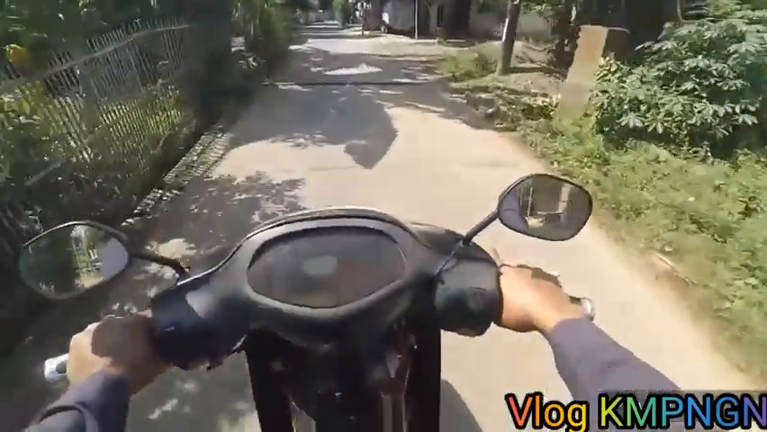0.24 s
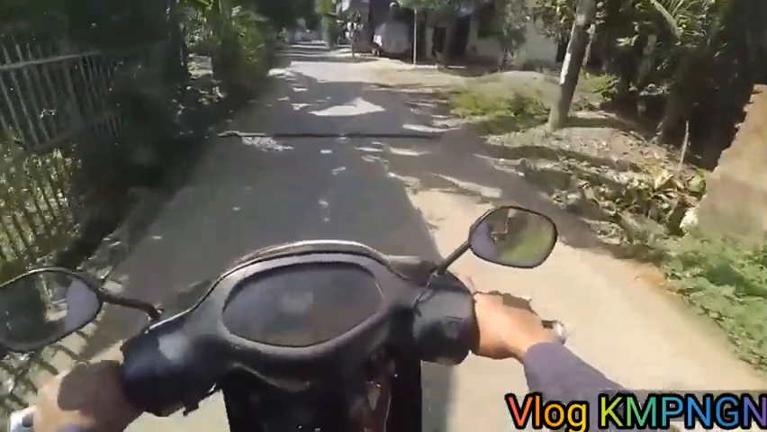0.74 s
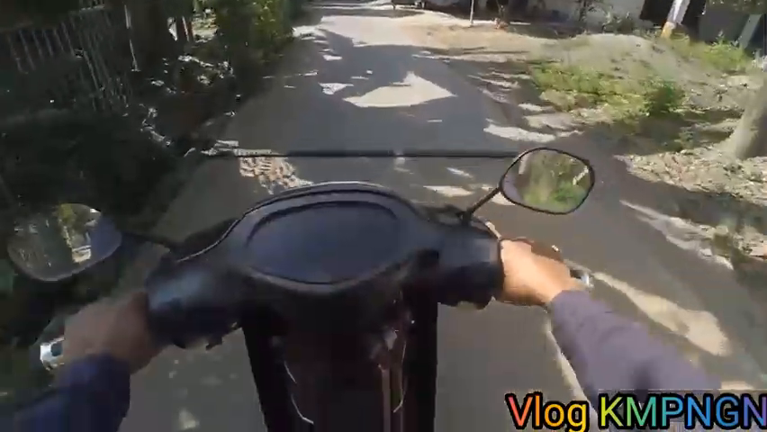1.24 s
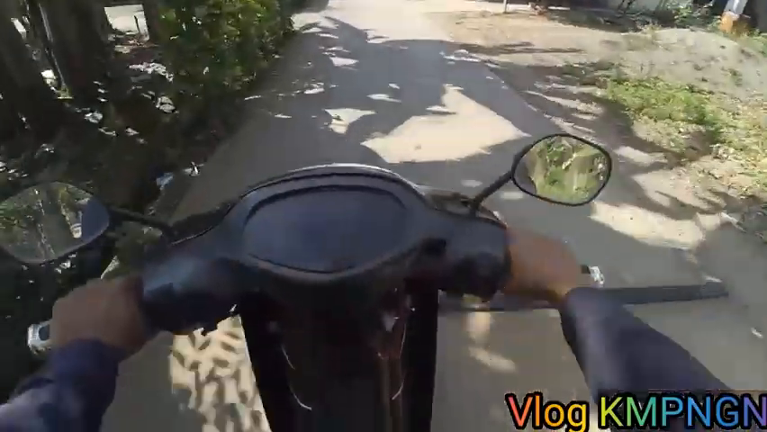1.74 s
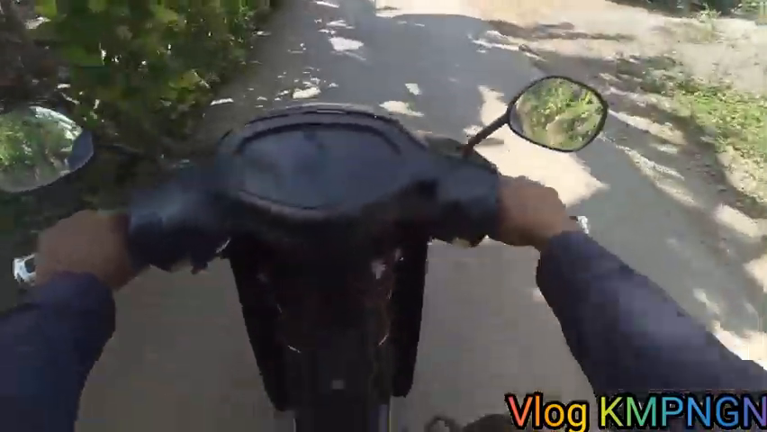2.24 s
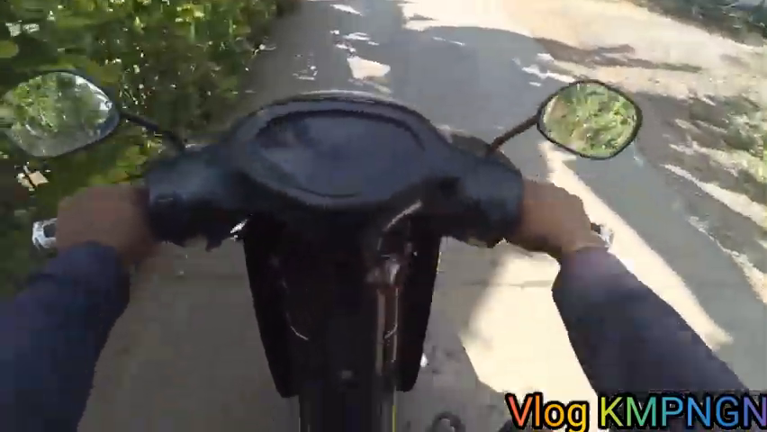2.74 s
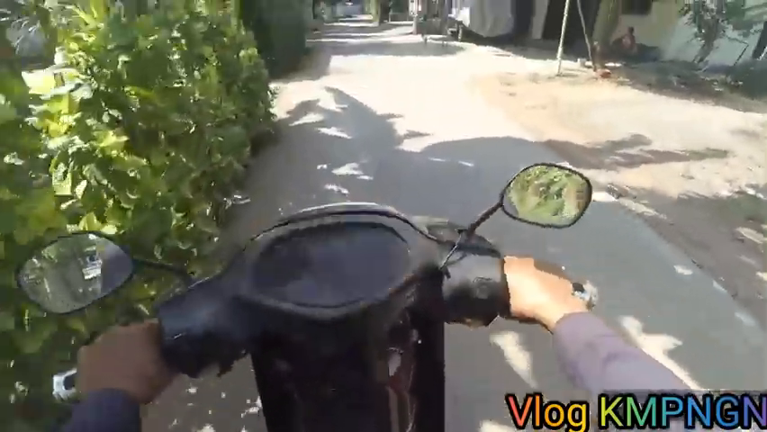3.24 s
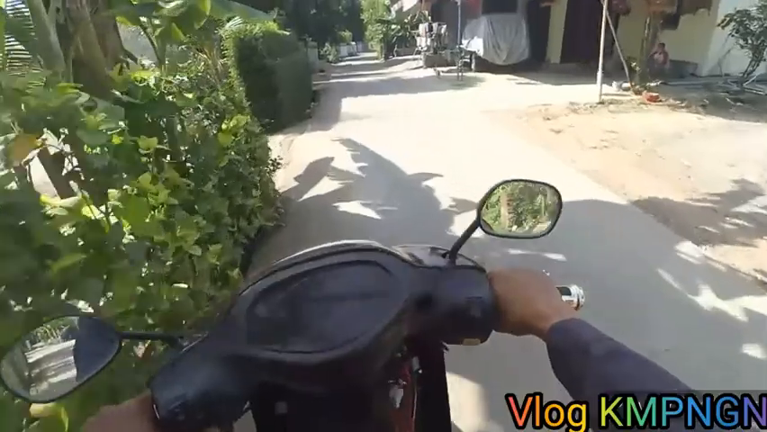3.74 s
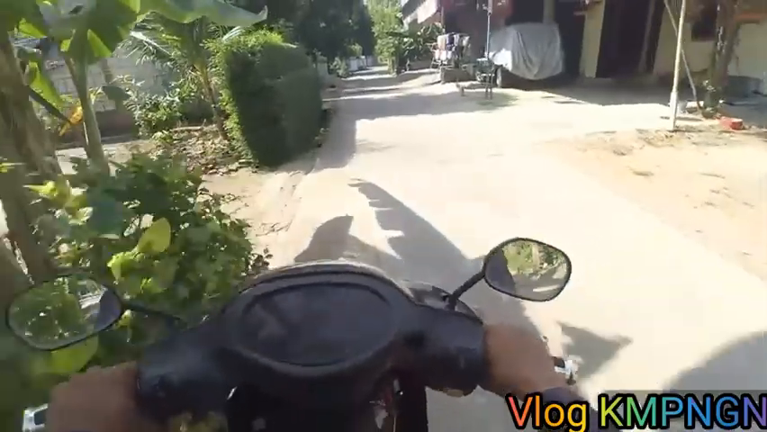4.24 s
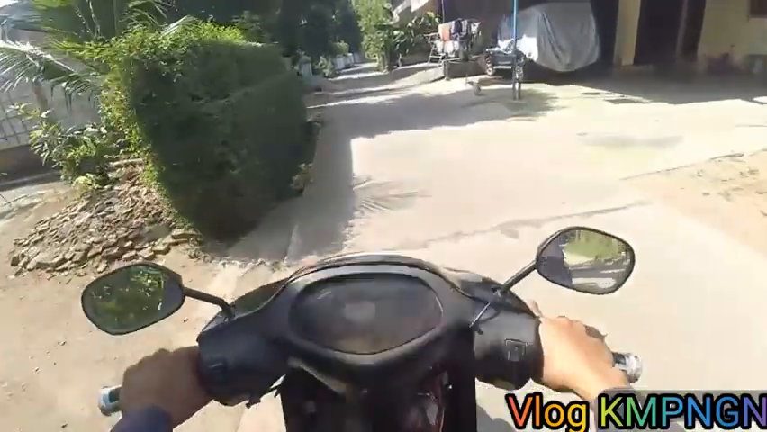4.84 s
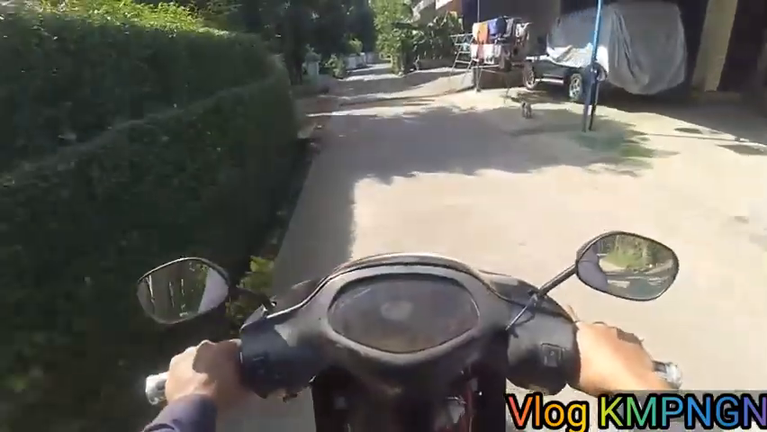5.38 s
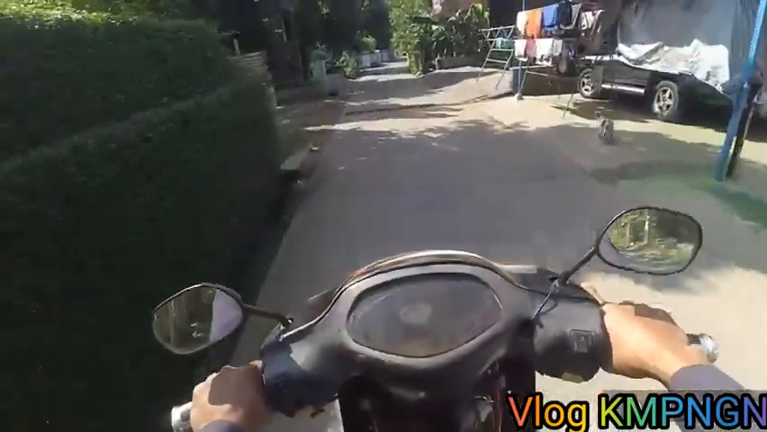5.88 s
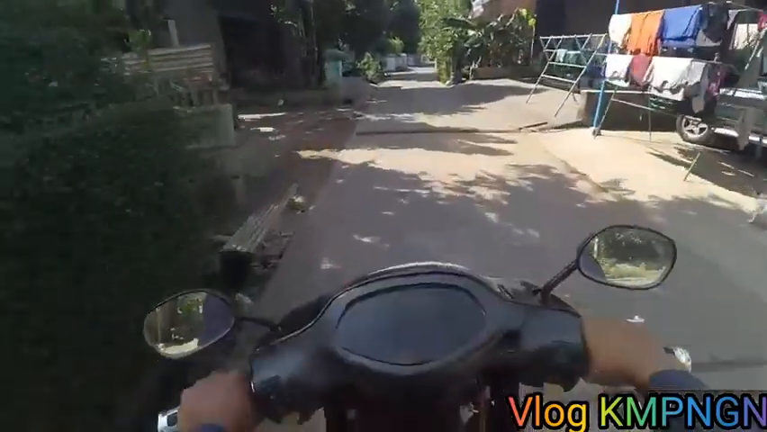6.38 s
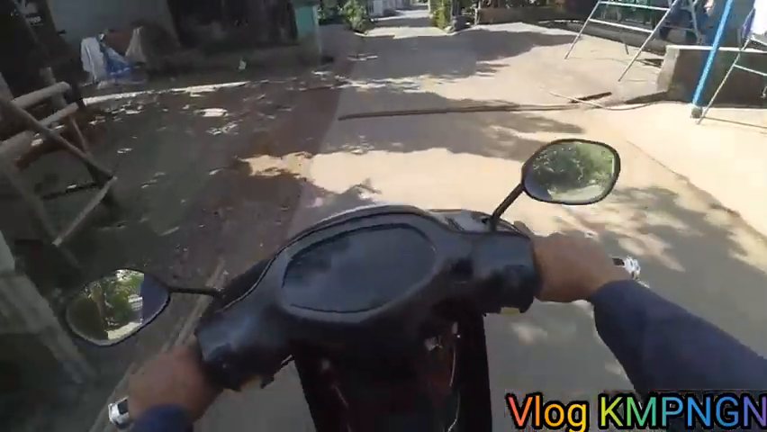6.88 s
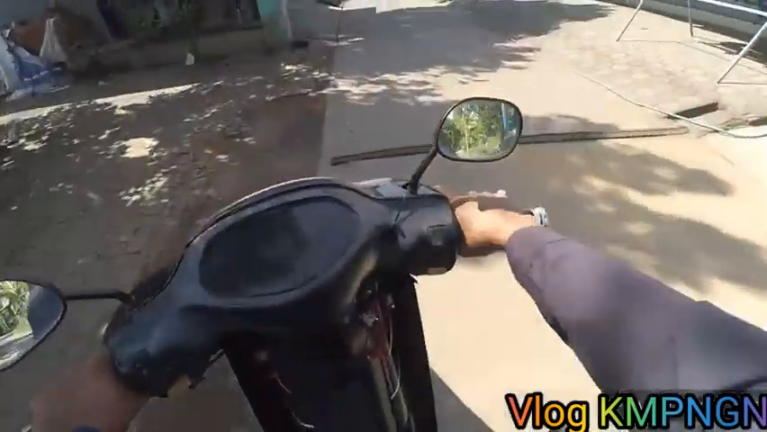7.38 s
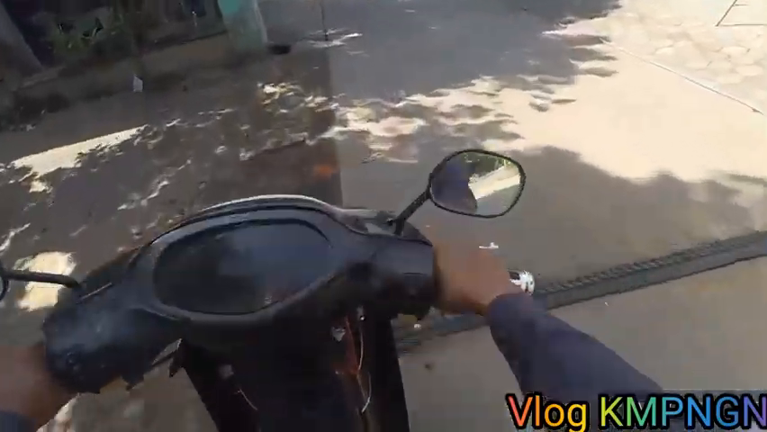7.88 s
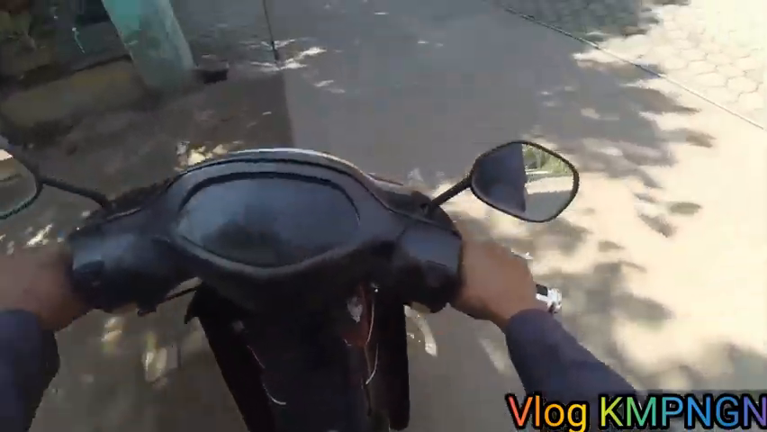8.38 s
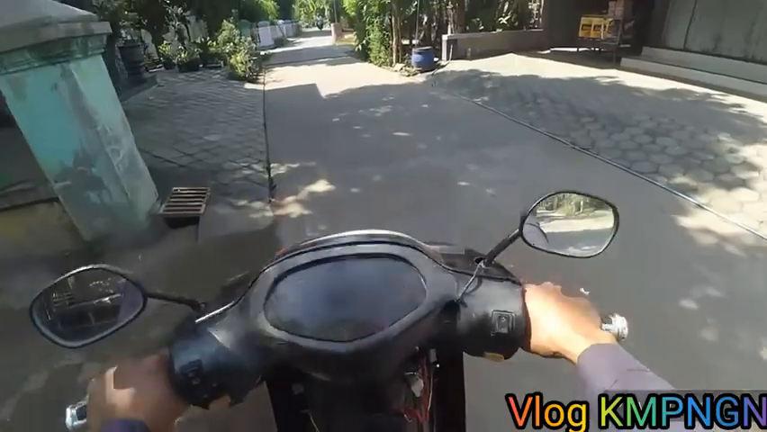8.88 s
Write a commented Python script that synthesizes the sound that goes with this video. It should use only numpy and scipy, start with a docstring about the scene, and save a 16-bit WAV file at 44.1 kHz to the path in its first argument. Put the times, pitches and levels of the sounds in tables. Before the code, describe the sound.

A close, bassy mono pickup on a scooter rider: blunt slow engine pops, shaking camera mount, casing rattle and soft road rush. After a scrape and sharp ticks, the wheel bangs over a bump with a deep, brief wobble. Throttle opens to a faster, buzzier throb, then fades to a lazy putter before rising once more. Roadside birds chirp, distant twitter flutters from hedges, and leaves rustle faintly near the end.

```python
"""Scooter on a lane

A small single-cylinder scooter rolls along a lane, heard by one microphone in a camera on the rider.
Each firing is a filtered pulse over gas noise; in some spans it is a blunt pop with a valve tick.
Sines and noise shake the camera mount; noise through resonances makes the casing rattle and road rush.
Decaying rings and shaped noise make ticks, brushing and a crunching speed bump; gliding sines make birds
chirp by the roadside and twitter in the hedges, and a noise burst rustles the leaves."""
import sys
import numpy as np
from scipy import signal
from scipy.fft import rfft, irfft, next_fast_len
from scipy.io import wavfile
from scipy.ndimage import uniform_filter1d, map_coordinates

SR = 44100
rng = np.random.default_rng(int(sys.argv[2]) if len(sys.argv) > 2 else 0)


def waveform_to_disk(signal):
    """Save audio, clipped to [-1, 1], as 16-bit WAV at the path in sys.argv[1]."""
    frames = np.transpose(np.atleast_2d(signal))
    scaled = np.clip(frames, -1, 1) * 32767
    samples = np.round(scaled).astype(np.int16)
    wavfile.write(sys.argv[1], SR, samples)


N = 402191
TIME = np.arange(N) / SR

# engine speed: time_s, firing_rate_hz
SPEED = [(0.0, 14.4), (0.3, 14.8), (0.76, 14.1), (1.01, 12.4), (1.3, 11.7), (1.44, 14.8), (1.7, 18.1),
         (1.98, 21.9), (2.14, 23.2), (2.39, 24.4), (2.71, 24.7), (3.53, 24.2), (3.95, 23.2), (4.29, 20.9),
         (4.7, 22), (4.92, 21.6), (5.08, 20.0), (5.25, 21.4), (5.41, 20.3), (5.62, 20), (5.76, 18.9),
         (6.1, 17.4), (6.83, 15.5), (6.99, 15.8), (7.31, 14.6), (7.5, 14.5), (7.72, 15.4), (7.99, 17.8),
         (8.3, 20), (8.51, 20.9), (9.12, 21.6)]
# throttle opening, sets the engine levels: time_s, opening_db
THROTTLE = [(0, -8.5), (.35, -9), (1.4, -8.5), (1.85, -2.5), (2.2, 2), (3.2, 3), (4.1, 0.7), (4.47, -2.5),
            (4.75, 0), (5, -3.5), (5.31, -1), (5.8, -2), (6.8, -4.5), (7.21, -6), (7.6, -6.5), (8.2, -3),
            (8.7, -1), (9, -2.4), (9.12, -1.5)]
# camera casing resonances: centre_hz, width_hz, level_db
CASING = [(988, 127, 2), (1091, 107, 2), (1237, 155, 1.5), (1535, 69, -3.5), (1797, 69, -3),
          (2052, 230, -5.5), (2387, 157, -4), (2639, 83, 0), (3290, 200, -11.5), (3510, 170, -10),
          (4145, 260, -2.5), (4530, 190, -26), (5830, 1730, -16)]


def amp(db):
    """Amplitude ratio of a level in dB."""
    return 10 ** (np.asarray(db) / 20)


def unit(x):
    """x scaled to rms 1."""
    return x / np.sqrt(np.mean(x ** 2) + 1e-20)


def curves(rows):
    """One value per sample for each column after the time."""
    time_s, *columns = np.transpose(rows)
    return [np.interp(TIME, time_s, column) for column in columns]


def wobble(rate_hz):
    """Smooth random curve, rate_hz knots a second."""
    knots = rng.standard_normal(int(N * rate_hz / SR) + 4)
    fine = map_coordinates(knots, [np.arange(8 * len(knots)) / 8])
    return np.interp(8 * rate_hz * TIME, np.arange(len(fine)), fine)


def filtered(x, response):
    """x through a complex response of frequency."""
    size = next_fast_len(N + SR)
    spectrum = rfft(x, size) * response(np.fft.rfftfreq(size, 1 / SR))
    return irfft(spectrum, size)[:N]


def modes(rows):
    """Causal response of parallel resonances (centre_hz, width_hz, level_db), signs alternating."""
    def response(f):
        total = 0
        for k, (hz, width_hz, db) in enumerate(rows):
            damping = 1j * f * width_hz
            total = total + (-1) ** k * amp(db) * damping / (hz * hz - f * f + damping)
        return total
    return response


def colour(points):
    """Gain through (frequency_hz, level_db) points on a log frequency axis."""
    point_hz, db = np.transpose(points)
    return lambda hz: amp(np.interp(np.log(hz + 1), np.log(point_hz + 1), db))


def levelled(x, window_s):
    """x held near rms 1 over a sliding, twice-smoothed window."""
    size = int(window_s * SR)
    power = uniform_filter1d(uniform_filter1d(x * x, size), size)
    return x / np.sqrt(np.abs(power) + 1e-20)


def patchy(patchy_db):
    """White noise with patches of random gain in time and frequency."""
    z = signal.stft(rng.standard_normal(N), nperseg=512)[2]
    field = uniform_filter1d(uniform_filter1d(rng.standard_normal(z.shape), 5, 0), 8, 1)
    return signal.istft(z * amp(patchy_db * unit(field)), nperseg=512)[1][:N]


def swells(events, width_s):
    """Sum of bell-shaped gains around (time_s, peak_db) events."""
    return sum(amp(db) * np.exp(-.5 * ((TIME - s) / width_s) ** 2) for s, db in events)


def cycle():
    """Firing count over time: the integral of a slightly unsteady firing rate."""
    late_cycles = .37  # the first firing comes this far in
    rate_hz = curves(SPEED)[0] * (1 + .002 * wobble(10))
    return np.cumsum(rate_hz) / SR + 1 - late_cycles


def hedge():
    """Short blurred notes flutter in the hedges and smear into echoes; once the leaves rustle close by."""
    # leaves rustling past: time_s, spread_s, centre_hz, width_hz, level_db
    leaf_burst = (8.73, .06, 4500, 2200, -47)
    # faint far notes: start_s, length_s, pitch_hz, level_db
    twitter_notes = [(0, 0.28, 7200, -64), (3.3, 0.16, 5400, -60), (4.04, .13, 7660, -62),
                     (4.2, .3, 6660, -56.5), (4.2, .1, 8800, -61), (4.43, .08, 8750, -62),
                     (4.45, .3, 7050, -62), (4.5, 0.28, 5600, -54), (4.62, 0.15, 8800, -67),
                     (4.86, .16, 7800, -65), (5.06, .1, 8800, -64), (5.95, .12, 7200, -62),
                     (5.98, .07, 8800, -66), (6.15, .3, 7900, -65), (6.33, .18, 8700, -69),
                     (6.35, 0.18, 7170, -60), (6.82, 0.19, 7140, -58), (6.84, .12, 8800, -64),
                     (6.86, .08, 6300, -59), (6.97, .15, 7500, -59), (7, .12, 7150, -61),
                     (7.05, 0.17, 6750, -62), (7.17, 0.34, 7320, -61), (7.26, .2, 6520, -60),
                     (7.5, 0.17, 7300, -64), (6.6, 0.22, 7600, -66), (7.3, 0.28, 7650, -70),
                     (7.35, 0.18, 8800, -69)]
    blur, drift, flutter_db = .011, .007, 2.8  # blur and drift are shares of pitch
    echo_t60_s, echo_db = 1, 0.5

    s, spread_s, leaf_hz, width_hz, leaf_db = leaf_burst
    leaves = unit(filtered(rng.standard_normal(N), lambda f: modes([(leaf_hz, width_hz, 0)])(f) ** 2))
    rustle = amp(leaf_db + 1.4 * wobble(96)) * np.exp(-.5 * ((TIME - s) / spread_s) ** 2) * leaves

    notes = np.zeros(N)
    for start_s, length_s, hz, db in twitter_notes:
        here = slice(round(start_s * SR), round((start_s + length_s) * SR))
        u = (TIME[here] - start_s) / length_s
        pitch_hz = hz * (1 + blur * wobble(600)[here] + drift * wobble(11)[here])
        shape = np.sqrt(np.sin(np.pi * np.clip(u, 0, 1)))
        size = amp(db - 1 + flutter_db * wobble(35)[here]) * shape
        notes[here] += size * np.sin(2 * np.pi * np.cumsum(pitch_hz) / SR)

    t = TIME[:SR // 2]
    far = rng.standard_normal(len(t)) * amp(-60 * t / echo_t60_s)
    echoes = signal.fftconvolve(notes, far / np.linalg.norm(far))[:N]
    return rustle + notes + amp(echo_db) * echoes


def birds():
    """Gliding, slightly husky whistles, trailed by scattered echoes from the lane."""
    # bird notes: start_s, length_s, start_hz, end_hz, level_db
    chirp_notes = [(0.12, 0.042, 7370, 7300, -58), (.22, .08, 7270, 7220, -66),
                   (.54, 0.14, 7870, 7700, -67), (1.73, 0.09, 5760, 5610, -49.5),
                   (1.873, 0.085, 3090, 3290, -41), (1.943, 0.057, 3230, 3210, -47),
                   (1.972, .045, 3430, 3430, -49), (1.96, 0.12, 5140, 5220, -56),
                   (1.999, 0.043, 3200, 2660, -43), (3.226, 0.018, 3920, 3560, -40),
                   (3.242, 0.04, 3470, 3600, -41), (3.877, .022, 4850, 4900, -42),
                   (3.9, 0.047, 4740, 4600, -33.5), (3.947, .013, 4800, 5500, -42),
                   (3.957, 0.032, 5380, 5100, -43), (3.994, .04, 5150, 5080, -51),
                   (3.988, .04, 4600, 4600, -49), (3.968, 0.04, 3330, 3350, -47),
                   (4.002, 0.013, 4380, 4100, -40), (5.145, .05, 3680, 3620, -49),
                   (5.151, 0.049, 7280, 5830, -43.5), (5.191, 0.017, 5900, 4430, -36.5),
                   (5.199, 0.039, 3860, 3310, -35), (5.233, 0.036, 3160, 3010, -43),
                   (5.27, .035, 2970, 2575, -45), (5.355, 0.036, 3840, 3470, -30.5),
                   (5.385, 0.035, 3510, 3300, -39.5), (5.575, 0.042, 2760, 2607, -40.5),
                   (5.675, 0.048, 3280, 2660, -43), (5.718, 0.033, 2900, 3100, -39.5),
                   (5.768, 0.066, 3290, 3390, -36.5), (5.835, 0.065, 3090, 2514, -35.5),
                   (5.92, .085, 2630, 2655, -49), (5.99, 0.086, 2326, 2260, -48.5),
                   (6.13, 0.073, 1800, 1830, -52), (6.22, 0.065, 2390, 2456, -48),
                   (6.299, 0.056, 2990, 2890, -47), (6.365, 0.089, 2970, 3290, -45),
                   (6.424, 0.086, 3280, 3500, -41.5), (6.441, 0.036, 3410, 3760, -42.5),
                   (6.47, .05, 4980, 4860, -56), (6.5, 0.04, 3000, 2620, -39),
                   (6.645, 0.08, 2660, 2575, -45), (6.686, 0.064, 4860, 5070, -56),
                   (6.763, .03, 5060, 4850, -56), (6.791, 0.025, 4800, 4330, -48)]
    settle, swell_share, edge_db = 1.6, .4, -9
    overtone_db, breath_db = -31.5, -19

    dry, quiver = np.zeros(N), wobble(250)
    breath_colour = colour([(2000, -30), (4000, 11.0), (15000, -16)])
    breath = amp(breath_db) * unit(filtered(rng.standard_normal(N), breath_colour))
    for start_s, length_s, start_hz, end_hz, db in chirp_notes:
        u = np.linspace(0, 1, round(length_s * SR))
        here = slice(round(start_s * SR), round(start_s * SR) + len(u))
        edge = np.clip(np.minimum(u, 1 - u) * length_s / .002, 0, 1)
        # the glide is quick at first and settles; the level swells, then fades
        hz = start_hz + (end_hz - start_hz) * np.expm1(-settle * u) / np.expm1(-settle)
        level_db = db + np.interp(u, [0, swell_share, 1], [edge_db, 0, edge_db])
        phase = 2 * np.pi * np.cumsum(hz * (1 + .006 * quiver[here])) / SR
        whistle = np.sin(phase) + amp(overtone_db) * np.sin(2 * phase) + breath[here]
        dry[here] += np.sqrt(2) * amp(level_db) * edge * whistle

    t = TIME[:SR // 3]
    lane = rng.standard_normal(len(t)) * amp(-60 * t / .5) * (t > .004)
    wet = amp(-4.5) * signal.fftconvolve(dry, lane / np.linalg.norm(lane))[:N]
    return amp(2.2) * (amp(2 * wobble(110) - 1.2) * dry + wet)


def ticks():
    """Each loose tick is one short ring of the casing over a noise click."""
    # ticks in the casing: time_s, level_db, ring_hz
    tick_rows = [(.811, -25, 4240), (.8405, -26, 4220), (1.043, -37, 4150), (1.1378, -39, 2100),
                 (1.2, -36, 1250), (1.3542, -29, 2580), (1.4715, -20.5, 1020), (2.176, -33, 2540),
                 (2.58, -30, 2650), (2.9981, -34, 2740), (5.025, -35, 2650), (5.074, -30.5, 2630),
                 (5.366, -27, 2590), (6.103, -33, 2710), (6.159, -31, 2590), (6.457, -33, 2550),
                 (6.581, -37, 4230), (7.0908, -36, 2060), (7.2245, -37, 2150), (8.0568, -35, 2690),
                 (8.3776, -35.5, 2660)]
    out, t = np.zeros(N + SR), TIME[:SR // 10]
    for s, db, hz in tick_rows:
        ring = np.sin(2 * np.pi * hz * t) * amp(-60 * t / 0.044) * (1 - np.exp(-t / 0.0011))
        click = 0.072 * amp(-60 * t / 0.013) * rng.standard_normal(len(t))
        out[round(s * SR):][:len(t)] += amp(db) * (ring + click)
    return out[:N]


def brush_and_crunch():
    """Gritty noise in fast-rising, dying bursts: brushing of the casing, then the speed bump's crunch."""
    # brushing, then from 1.453 s the crunch of the bump: start_s, rise_s, t60_s, level_db, lowpass_hz
    bursts = [(.65, 0.037, 0.31, -35, 14000), (.762, 0.0077, 0.55, -34, 14000),
              (0.808, 0.0027, 0.093, -21.5, 8950), (0.838, .001, 0.26, -30, 8950),
              (.856, .003, 0.035, -43, 6000), (1.35, 0.0013, 0.15, -36.5, 12000),
              (1.394, .006, 0.083, -27.5, 2220), (1.453, .0015, 0.049, -26, 2800),
              (1.464, .002, .05, -27, 2700), (1.474, 0.0024, 0.075, -28.5, 2400),
              (1.497, .003, 0.058, -33, 1820)]
    # grit spectrum: frequency_hz, density_db
    grit_colour = [(120, -53), (200, 4.5), (330, 0), (494, 0), (697, -6.5), (1220, 2), (1390, -9),
                   (1750, 0.5), (3750, -5.5), (4180, 2.5), (5010, -4.5), (15100, -24)]
    grit = amp(2.8 * wobble(300)) * rng.standard_normal(N)
    grit = unit(filtered(grit, lambda hz: colour(grit_colour)(hz) * (.5 + np.abs(modes(CASING)(hz)))))
    out, t = np.zeros(N), TIME[:SR // 4]
    for s, rise_s, t60_s, db, lowpass_hz in bursts:
        here = slice(round(s * SR), round(s * SR) + len(t))
        dulled = signal.sosfilt(signal.butter(5, lowpass_hz, fs=SR, output="sos"), grit[here])
        sounding = (s > .8) | (s + t < .872)  # bursts begun before 0.8 s end abruptly at 0.872 s
        out[here] += amp(db - 60 * t / t60_s) * (1 - np.exp(-t / rise_s)) * sounding * dulled
    return out


def bump():
    """The wheel hits the bump: the mount starts to swing, the frame bottoms out a moment later."""
    # speed bump: time_s, gain_db
    bump_event = (1.4625, 2.4)
    # swing of the mount: pitch_hz, t60_s
    mount_swing = (21.9, .8)
    # frame modes: pitch_hz, level_db, t60_s
    frame_modes = [(77.4, -19.5, 0.18), (151, -21, 0.12), (256, -17.5, 0.066), (271, -34, 0.13),
                   (432, -24, 0.037), (810, -22.5, 0.038), (930, -18.5, 0.032), (1236, -26, 0.057),
                   (2055, -47, 0.034), (2620, -37, .04)]
    s, gain_db = bump_event
    swing_hz, swing_t60_s = mount_swing

    t = np.clip(TIME - s, 0, None)
    out = amp(-60 * t / swing_t60_s) * (1 - np.exp(-t / .009)) * np.sin(2 * np.pi * swing_hz * t)
    t = np.clip(t - .007, 0, None)
    blow = 1 - np.exp(-(t / .0012) ** 2)
    for hz, level_db, t60_s in frame_modes:
        out += amp(level_db - 60 * t / t60_s) * blow * np.sin(2 * np.pi * hz * t)
    damping = np.clip((s + 0.183 - TIME) / 0.027, 0, 1)  # the rider's body damps the swing
    return amp(gain_db) * out * damping


def running(turns):
    """Valve gear rattles each casing mode by fits, strongest at each firing; road and air rush under it."""
    # road and air spectrum: frequency_hz, density_db
    road_colour = [(100, -24), (170, -16), (240, -13), (270, -11), (305, -2.5), (345, -8.5), (500, -11.5),
                   (700, -15), (1000, -7), (1650, -11.5), (2600, -7.5), (4000, -12.5), (6000, -20),
                   (7500, -23), (9000, -29), (12000, -35.5), (15200, -39.5)]
    # flare-ups of the lowest casing mode: time_s, added_gain_db
    flares = [(2.22, -4), (3.27, 0), (3.4, -1), (3.65, -4), (3.84, 5), (4.2, 6)]
    rattle_db, rush_db, rush_follows = -43, -44.5, 0.53  # rush_follows: dB per dB of throttle
    flare_s = 0.036

    throttle_db, = curves(THROTTLE)
    beat = amp(2.5 * np.exp(-4 * (turns % 1)) + .6 * wobble(8) + .8 * wobble(40))
    rattle = np.zeros(N)
    for hz, width_hz, db in CASING:
        # a new random gain every 500 samples
        fits = np.repeat(amp(2.3 * rng.standard_normal(N // 500 + 1)), 500)[:N]
        if hz == CASING[0][0]:
            fits = fits * (1 + swells(flares, flare_s))
        taps = beat * fits * rng.standard_normal(N)
        rattle += amp(db) * filtered(taps, lambda f: modes([(hz, width_hz, 0)])(f) ** 2)
    rush = unit(filtered(np.sqrt(beat) * patchy(patchy_db=1.5), colour(road_colour)))
    return amp(rattle_db + throttle_db) * unit(rattle) + amp(rush_db + rush_follows * throttle_db) * rush


def mount(turns):
    """Firing, crank imbalance (twice as fast) and road shake the springy mount; jolts swell the shake."""
    # resonances of the mount: centre_hz, width_hz, level_db
    spring_modes = [(23.08, 6.1, -0.5), (31.5, 8.26, 3.5)]
    # motion of the mount: time_s, shake_db, slow_sway_db
    motion = [(0, -28, -20), (.25, -34.5, -30.5), (.5, -25, -28.5), (.74, -32, -18.5), (1.1, -33.5, -23.5),
              (1.33, -22.5, -15.5), (1.72, -40, -24.5), (2.1, -25, -40), (2.7, -27, -34), (3.7, -33.5, -35),
              (4.3, -27.5, -33.5), (5.1, -31.5, -32.5), (5.9, -33, -37), (6.2, -22.5, -32),
              (6.9, -25, -34.5), (7.2, -28.5, -22), (7.6, -25, -41.5), (8.05, -25.5, -32.5),
              (8.3, -33.5, -35.5), (9.12, -33, -43)]
    # jolts from the road surface: time_s, peak_db
    jolts = [(.885, -16), (1.05, -18), (1.25, -29), (2.86, -27.5), (4.17, -32), (5.45, -24), (6.67, -19.5),
             (8.64, -31), (9.0, -37)]
    shake_wander_db, sway_wander_db, jolt_s, crank_db = 1.6, 2.2, .03, -42.5

    shake_db, sway_db = curves(motion)
    spring = modes(spring_modes)
    force = np.sin(2 * np.pi * turns) + amp(-8.5) * np.sin(4 * np.pi * turns)
    road = unit(filtered(rng.standard_normal(N), spring))
    shake = filtered(force + amp(-14.0) * road, lambda f: spring(f) ** 2)
    sway = filtered(rng.standard_normal(N), lambda f: modes([(7.5, 7, 0)])(f) ** 3)
    shake_size = amp(shake_db + shake_wander_db * wobble(11)) + swells(jolts, jolt_s)
    sway_size = amp(sway_db + sway_wander_db * wobble(13))
    # the crank also reaches the camera stiffly
    crank = amp(crank_db + curves(THROTTLE)[0]) * np.sin(4 * np.pi * turns)
    return crank + shake_size * levelled(shake, 0.054) + sway_size * levelled(sway, 0.15)


def exhaust(turns):
    """One pressure pulse per firing leaves the silencer, its bass lagging; turbulent gas rumbles under it."""
    # silencer response: frequency_hz, gain_db
    pipe_colour = [(30, -30), (49, -2), (73, -8), (98, -8), (122, 1), (150, -3), (196, -5.5), (245, -12),
                   (275, -19), (318, -12), (345, -22), (368, -17), (395, -21), (440, -22), (485, -13),
                   (520, -22), (620, -50)]
    # crispness of the firings: time_s, crisp_share
    crispness = [(0, 0), (1.5, 0.3), (2.2, .8), (3.2, 0.83), (3.9, 0.64), (4.3, 0.35), (4.8, .1),
                 (5.1, 0.8), (5.8, 0.8), (6.4, 0.5), (7.3, 0), (7.9, 0.9), (8.5, 0.33), (9.12, 0.3)]
    # turbulent gas and panels: frequency_hz, density_db
    gas_colour = [(30, -37), (42, -12), (62, 0), (86, -6.5), (110, -3.5), (135, -12), (165, -20),
                  (260, -26), (400, -70)]
    # puffs of turbulent gas: time_s, peak_db
    puffs = [(0.02, -43.5), (.86, -54), (1.84, -39), (2.88, -67), (3.66, -44), (4.16, -50), (5.32, -38),
             (5.45, -42), (5.62, -44), (6.1, -61), (6.26, -47), (7.09, -45), (7.69, -52), (7.9, -45.5),
             (8.93, -53), (9.09, -40.5)]
    # boom of a puff in the pipe: centre_hz, width_hz, level_db
    puff_ring = [(97.2, 39, 0)]
    # spans of blunt putt-putt firings: start_s, end_s, pop_level_db
    blunt_spans = [(-0.5, 1.57, -55.5), (5.3, 6.5, -50)]
    # resonance of a blunt pop: centre_hz, width_hz, level_db
    pop_ring = [(114, 113, 0)]
    thud_db, thud_follows = -44, 1  # thud_follows: dB per dB of throttle
    gas_db, gas_wander_db, puff_s = -48, 1.5, 0.077
    gas_calms = 0.27  # dB less rumble per dB of throttle
    pop_dull_hz, change_s = 260, 0.033
    valve_db, valve_scatter_db = -9, 5

    throttle_db, = curves(THROTTLE)
    load = np.clip((curves(SPEED)[0] - 15) / 8, 0, 1)
    fired = np.flatnonzero(np.diff(np.floor(turns)))
    pulses = np.zeros(N)
    # a slower engine fires less evenly
    pulses[fired] = amp((1.8 - 1.4 * load[fired]) * rng.standard_normal(len(fired)))

    def lag(hz):
        return np.exp(-2j * np.pi * (1.2 * np.log(hz + 20)))

    def again(hz):
        # the low part of each pulse runs back along the pipe and leaves a second time
        return 1 + .55 * np.exp(-2j * np.pi * hz * .0136) / (1 + (hz / 210) ** 4)

    sharp = filtered(pulses, lambda hz: colour(pipe_colour)(hz) * lag(hz) * again(hz))
    # duller firings, lowpassed, mixed in as the crispness falls
    dull = filtered(sharp, lambda hz: 1 / np.sqrt(1 + (hz / 165) ** 10))
    crisp = np.clip(curves(crispness)[0], 0, 1)
    thud = levelled(crisp * unit(sharp) + (1 - crisp) * unit(dull), .3)

    gas = unit(filtered(rng.standard_normal(N), colour(gas_colour)))
    boom = unit(filtered(rng.standard_normal(N), lambda hz: modes(puff_ring)(hz) ** 2))
    gas_size = amp(gas_db - gas_calms * throttle_db + gas_wander_db * wobble(9.9))
    rumble = gas_size * gas + swells(puffs, puff_s) * boom

    pop = unit(filtered(pulses, lambda hz: modes(pop_ring)(hz) / (1 + 1j * hz / pop_dull_hz) ** 2))
    # a valve ticks with the pops, louder as the crispness rises
    valve_hits = pulses * amp(valve_scatter_db * rng.standard_normal(N))
    valve = unit(filtered(valve_hits, lambda hz: modes([(2620, 420, 0)])(hz) ** 2))
    pop_and_valve = levelled(pop, .3) + amp(valve_db) * crisp * valve

    pops, blunt = np.zeros(N), np.zeros(N)
    for start_s, end_s, db in blunt_spans:
        share = np.clip(np.minimum(TIME - start_s, end_s - TIME) / change_s + .5, 0, 1)
        pops += amp(db) * share * pop_and_valve
        blunt += share
    return pops + (1 - blunt) * amp(thud_db + thud_follows * throttle_db) * thud + rumble


def scene():
    """All sources summed, the same in both channels."""
    turns = cycle()
    nature = hedge() + birds()
    knocks = ticks() + brush_and_crunch() + bump()
    one = nature + knocks + running(turns) + mount(turns) + exhaust(turns)
    return np.array([one, one])


def record(dry):
    """The input stage rounds off the loudest swing; nothing is kept above the band limit."""
    top_hz = 15280
    soft = dry[0] / (1 + np.abs(dry[0] / .95) ** 12) ** (1 / 12)
    one = filtered(soft, lambda hz: hz < top_hz)
    return np.array([one, one])


dry = scene()
out = record(dry)
waveform_to_disk(out)
```